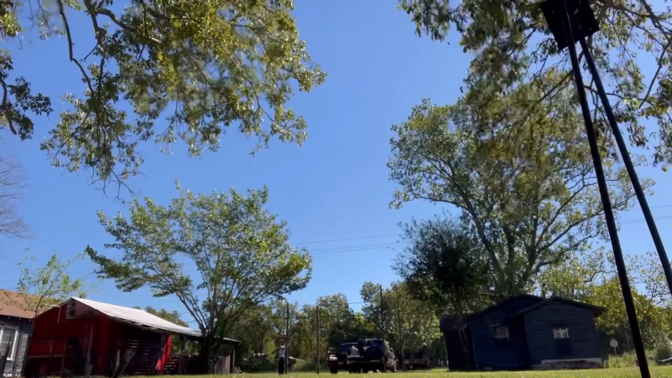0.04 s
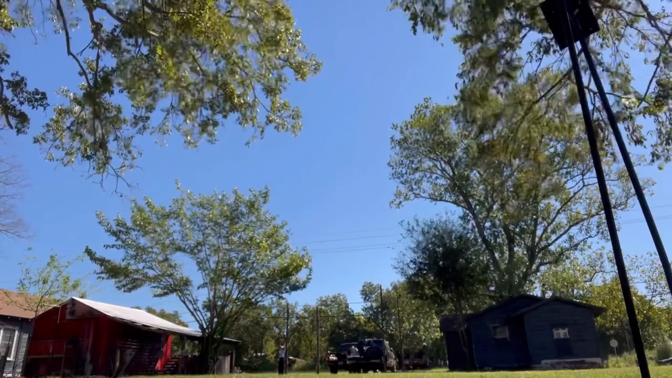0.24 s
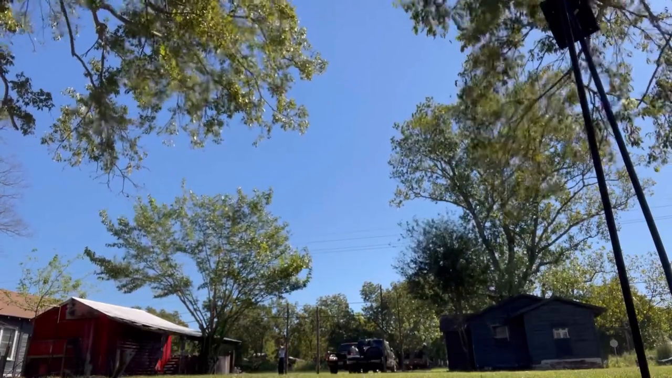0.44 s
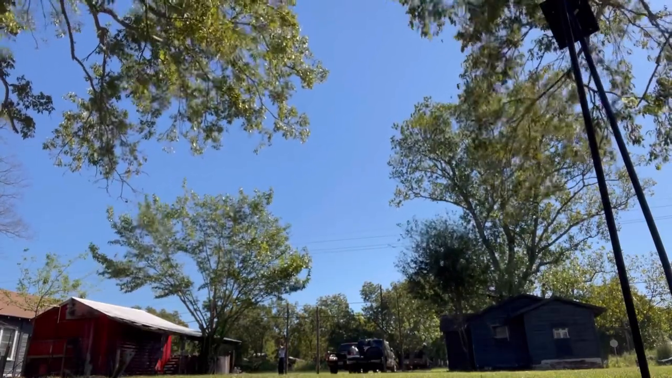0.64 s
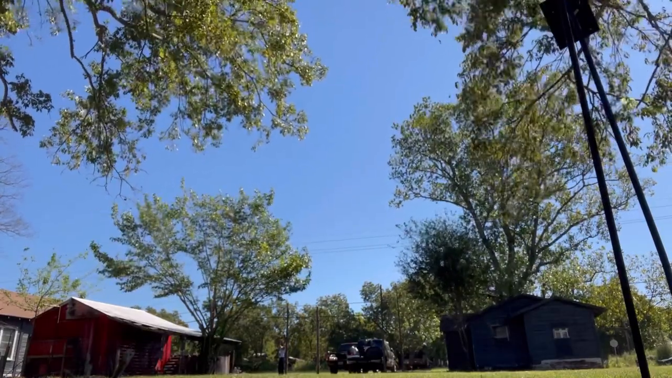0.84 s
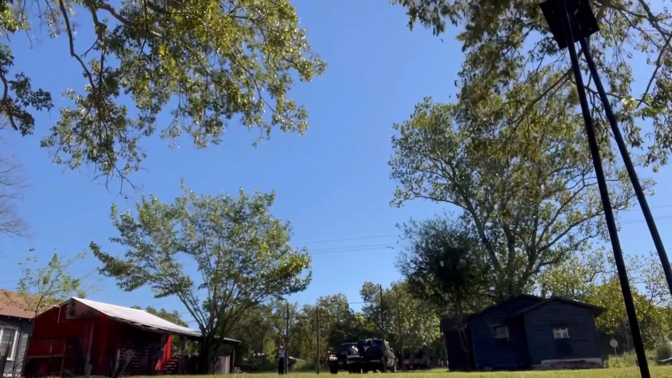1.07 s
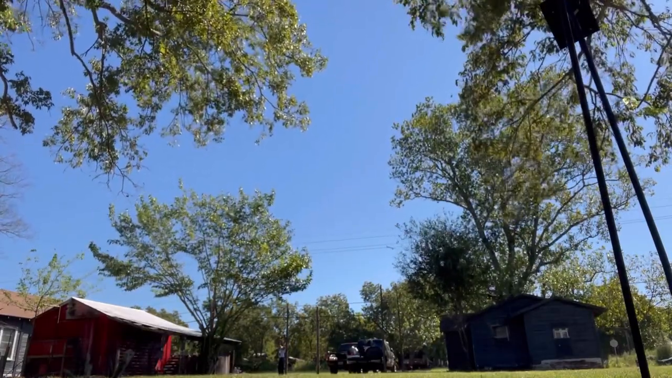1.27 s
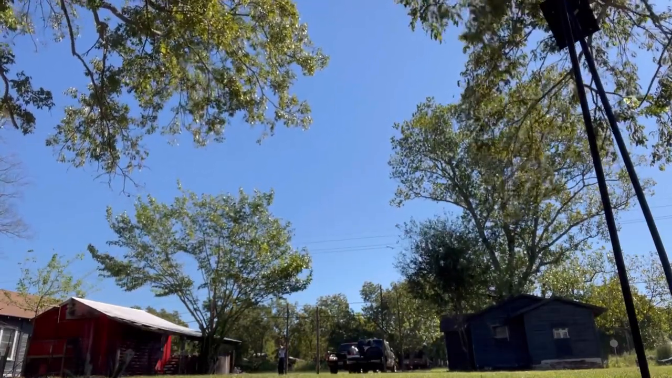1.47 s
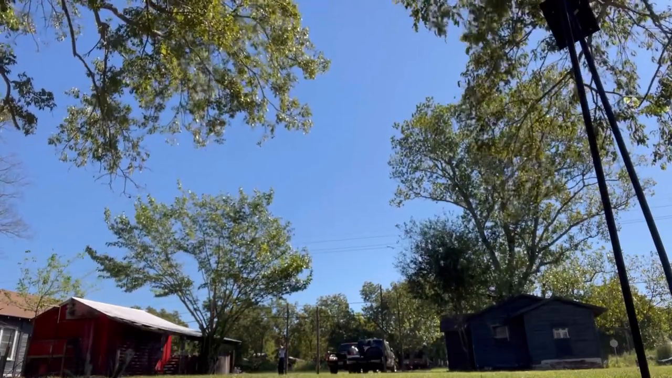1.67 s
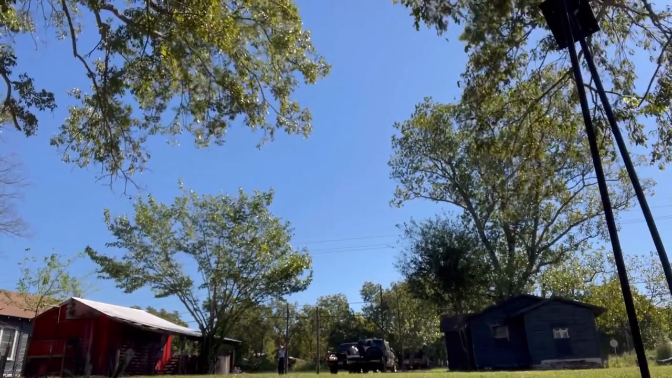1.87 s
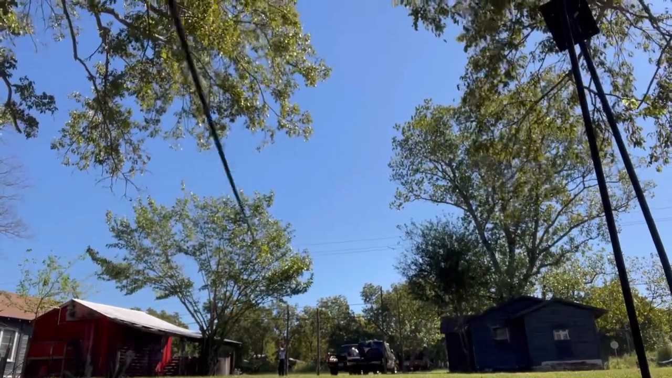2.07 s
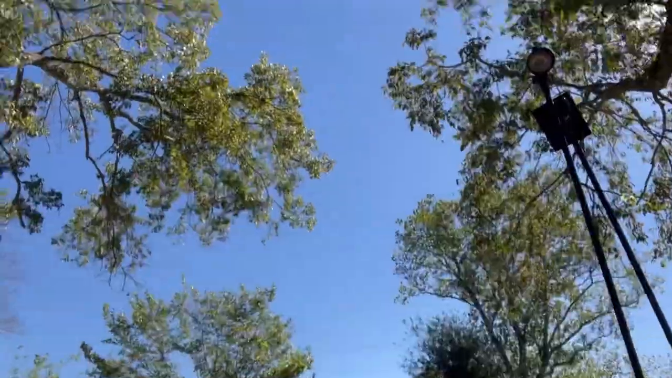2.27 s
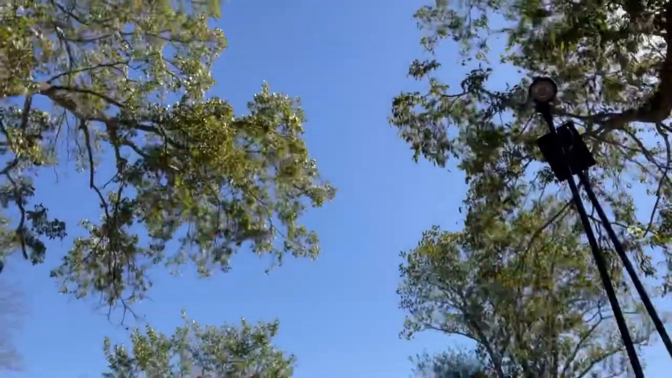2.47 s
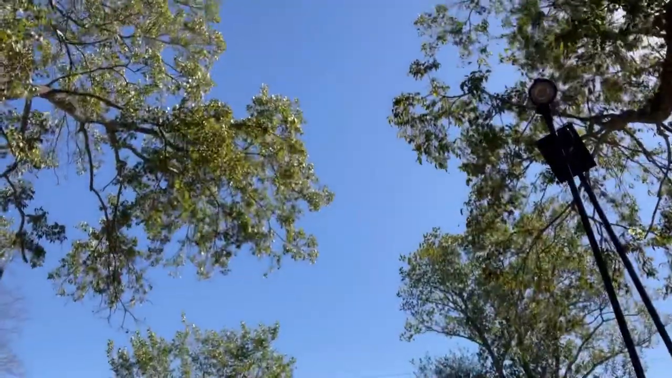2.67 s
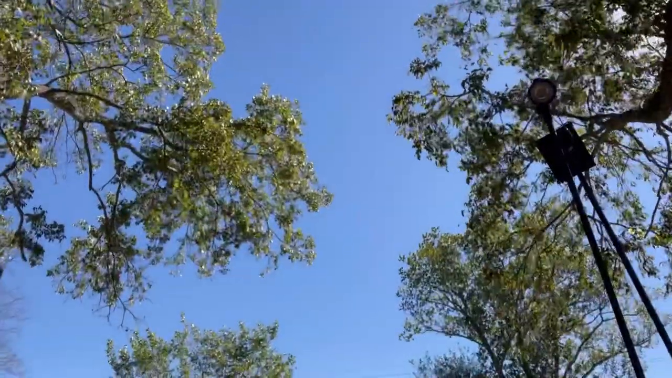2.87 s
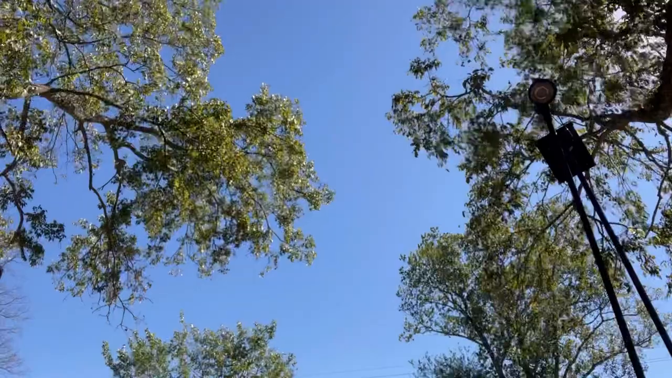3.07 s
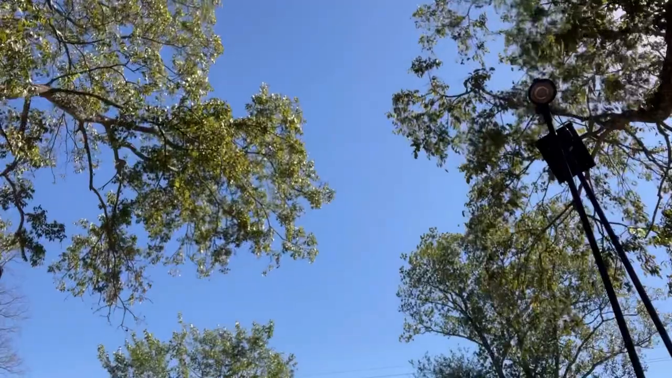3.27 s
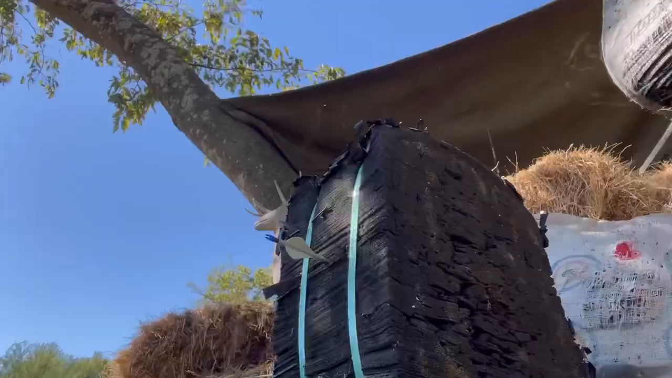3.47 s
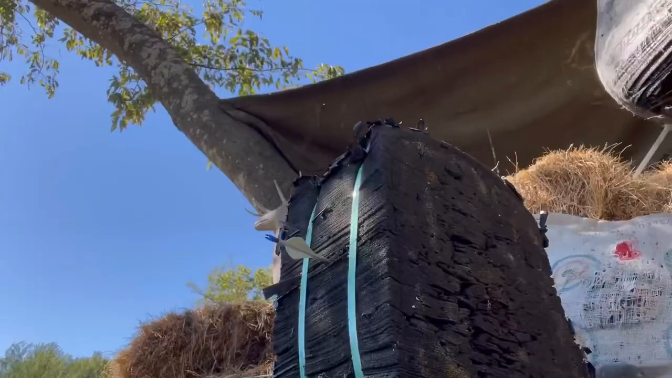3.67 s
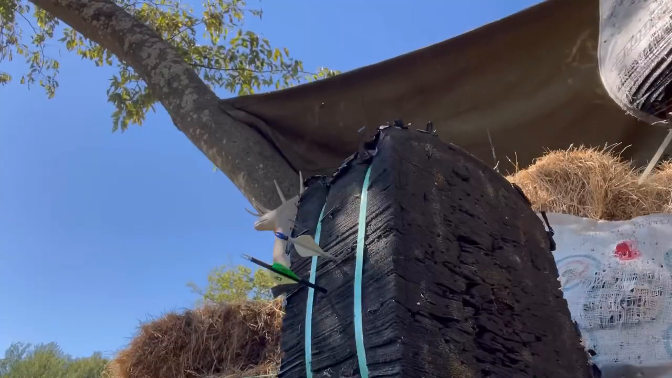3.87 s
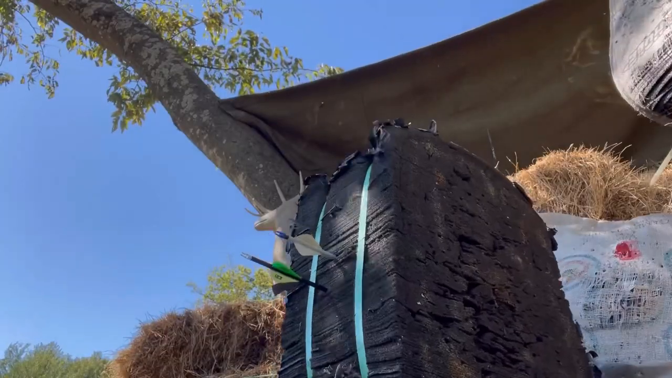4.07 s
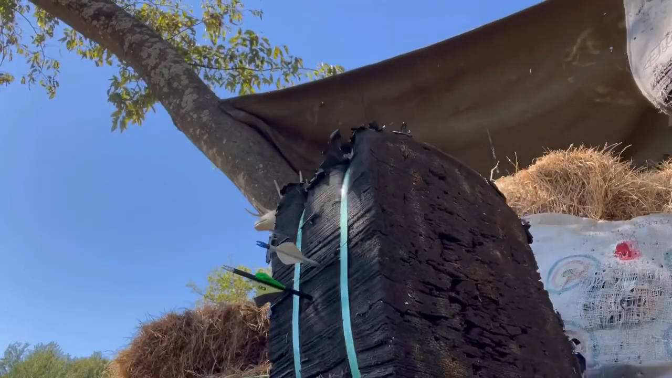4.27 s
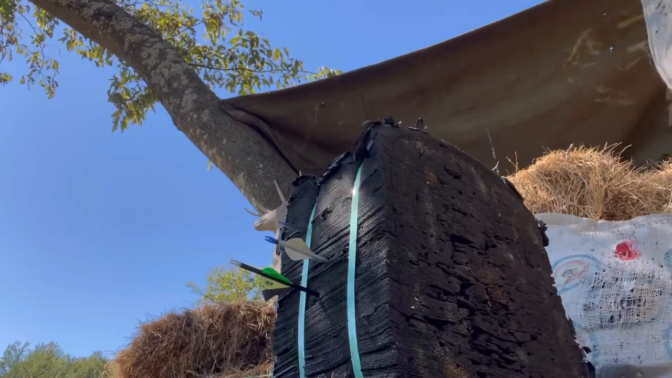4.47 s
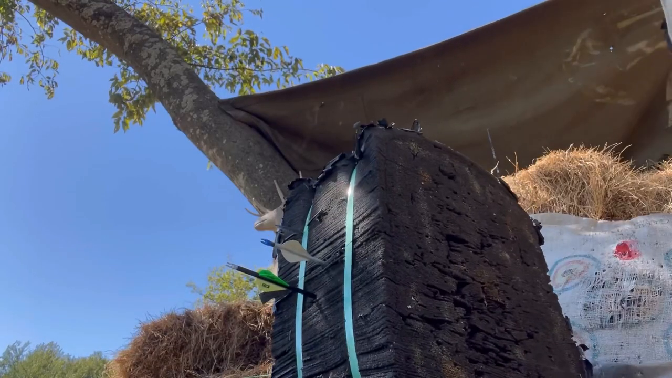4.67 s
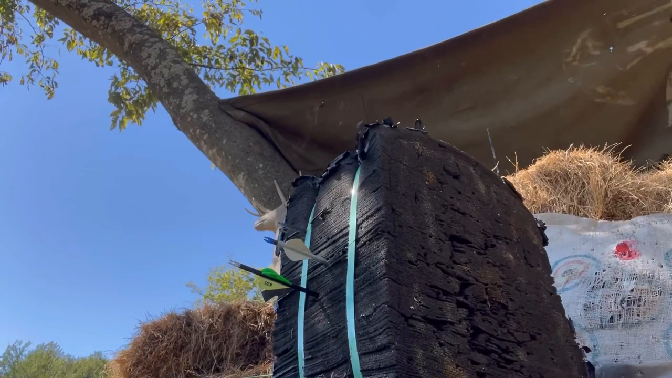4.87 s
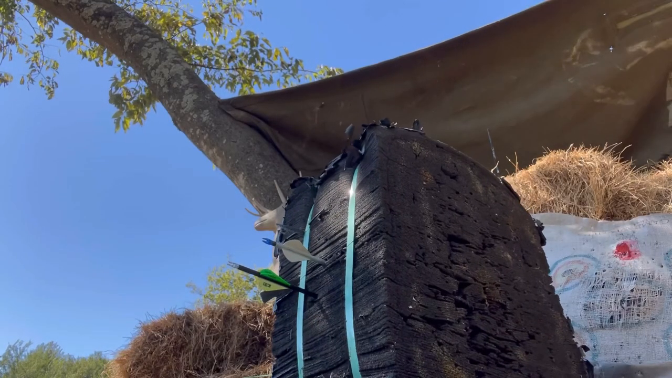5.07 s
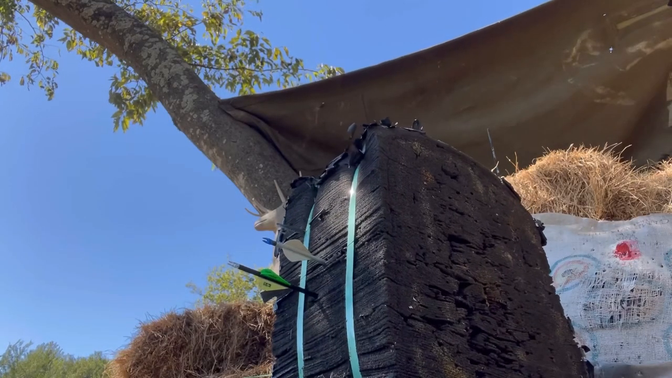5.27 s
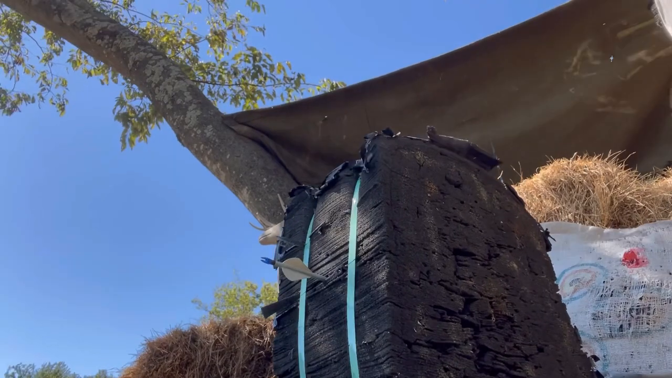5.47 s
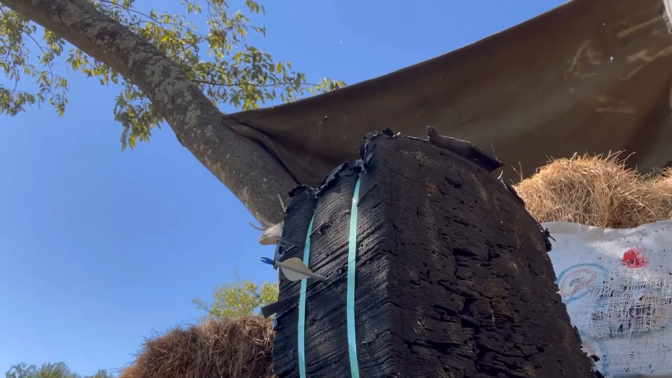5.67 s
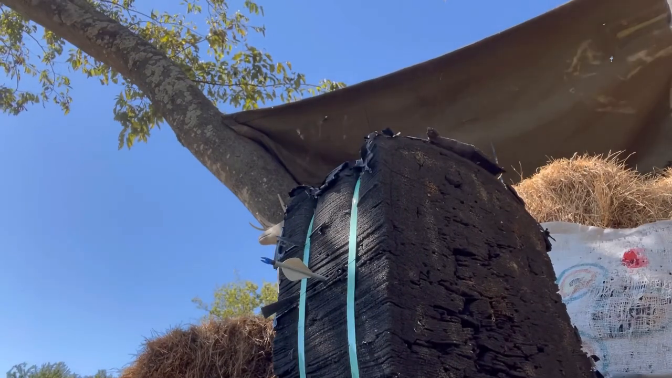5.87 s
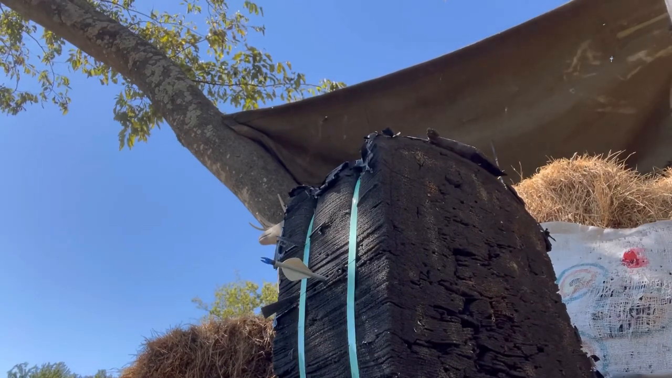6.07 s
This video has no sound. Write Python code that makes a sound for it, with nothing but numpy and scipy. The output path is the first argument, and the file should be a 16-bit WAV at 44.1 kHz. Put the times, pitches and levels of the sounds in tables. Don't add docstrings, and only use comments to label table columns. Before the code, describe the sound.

A faint distant bow twang, then an arrow thwacks hard into foam, jolting the microphone into crunching dry grass; a second brighter thwack follows with creaks.

```python
import sys
import numpy as np
from scipy import signal
from scipy.io import wavfile
from scipy.ndimage import uniform_filter1d, minimum_filter1d

SR = 44100
rng = np.random.default_rng(int(sys.argv[2]) if len(sys.argv) > 2 else 0)


def magnitude_from_level(level_db):
    exponent = np.asarray(level_db, float) / 20
    return 10 ** exponent


def generate_wav(sig):
    pcm = np.round(np.clip(np.atleast_2d(sig).T, -1, 1) * 32767).astype(np.int16)
    wavfile.write(sys.argv[1], SR, pcm)


N = 269803
T = np.arange(N) / SR
SIDES = np.array([[1.], [-1.]])


def at_hz(points, hz):
    points = np.array(points)
    return np.interp(np.log(hz), np.log(points[:, 0]), points[:, 1])


def pan(db):
    return magnitude_from_level(SIDES * np.asarray(db) / 2)


def drift(rate, size):
    knots = rng.standard_normal(int(size / SR * 60) + 3)
    step = np.clip(rate / 30, .01, 1)
    slow = signal.lfilter([step], [1, step - 1], knots)
    return np.interp(np.arange(size) * 60 / SR, np.arange(len(slow)), slow / slow.std())


def resonate(x, hz, width_hz):
    r = np.exp(-np.pi * min(width_hz, 9000) / SR)
    feedback = [1, -2 * r * np.cos(2 * np.pi * hz / SR), r * r]
    return signal.lfilter([1, 0, -1], feedback, x) * np.sqrt((1 - r * r) / 2)


def ring(hz, t60, bend=1, size=3000):
    t = T[:size]
    return np.sin(2 * np.pi * hz * t) * magnitude_from_level(-60 * (t / t60) ** bend)


def add(out, s, sound):
    i = int(round(s * SR))
    out[:, i:i + sound.shape[-1]] += sound[..., :N - i]


def coloured(white, spectrum, alike, patchy_db, split_hz=1500):
    size, halves = white.shape[-1], [0, 0]
    edges = 20 * 2 ** np.arange(0, 9.8, 1 / 3)
    shared = drift(0.85, size)
    for k, (low, high) in enumerate(zip(edges, edges[1:])):
        band = signal.butter(2, [low, high], "band", fs=SR, output="sos")
        mid, side = signal.sosfilt(band, white[k % 2])
        hz = np.sqrt(low * high)
        c = np.clip(at_hz(alike, hz), -.95, .95)
        gain = magnitude_from_level(at_hz(spectrum, hz) + patchy_db * (.5 * shared + drift(17.4, size)))
        halves[int(hz > split_hz)] += gain * (np.sqrt(1 + c) * mid + np.sqrt(1 - c) * side * SIDES)
    return [h / np.sqrt(np.mean(h.mean(0) ** 2)) for h in halves]


PLACE_STARTS = [0, .712, 3.505, 5.405, 6.2]
# f/Hz, level/dB [dB per Hz]
TOP = [(9000, -40), (10500, -30), (13000, -43.5), (16000, -45)]
TOP_B = [(9000, -56), (10800, -35), (13000, -56.5), (14500, -57), (16000, -57)]
# f/Hz, level/dB [dB per Hz]
AIR = [
    [(35, -102), (60, -64), (124, -13), (180, -2.5), (274, -4.5), (323, -15), (371, 1.5), (458, -8),
     (882, -10), (3670, -23), (6580, -36.5), (13900, -34), (16000, -36)],
    [(13, -43), (22, -32), (43, -3.5), (113, -0.5), (141, -8.0), (297, -11.5), (441, -15.5), (511, -12.5),
     (1130, -23.0), (1770, -29.5), (6090, -29.0), (8200, -34.0), (10700, -62), (18000, -120)][:-1] + TOP,
    [(13, -32), (22, -8.0), (107, -3.0), (125, -11.0), (148, -17.0), (205, -14), (249, -17.5), (297, -15.0),
     (579, -19.0), (950, -22.5), (2150, -42.5), (8200, -38.5), (10700, -84), (18000, -120)][:-1] + TOP_B,
    [(13, -46), (22, -27), (70, 2.5), (125, -1.0), (282, -16.5), (452, -16.0), (706, -19.5), (904, -27),
     (974, -23.5), (2260, -46.5), (2690, -45.0), (8200, -39.0), (10700, -82.0), (18000, -120)][:-1] + TOP_B,
]
# f/Hz, likeness [-1..1]
ALIKE = [
    [(60, 0.96), (240, 0.57), (950, 0.69), (3770, -0.16), (15000, -0.15)],
    [(60, 0.17), (180, 0.67), (550, 0.26), (1650, -0.24), (4970, -0.067), (15000, 0.41)],
    [(60, 0.78), (150, 0.59), (380, -0.059), (950, -0.6), (2380, 0.12), (5980, -0.31), (15000, -0.15)],
    [(60, 1), (180, 0.39), (550, -0.53), (1650, -0.38), (4970, -0.28), (15000, 0.044)],
]
# f/Hz, width/Hz, level/dB
DRONE = [
    [(193.5, 3.9, -54), (277.7, 4.8, -54), (365.4, 2.7, -52), (390, 6.4, -80), (423, 5.5, -51),
     (546, 11, -56.5), (873, 7.4, -60)],
    [(55, 9.5, -55), (82, 6.1, -65), (117.8, 9.1, -50), (3850, 920, -65)],
    [(49.7, 3.9, -49), (81.7, 1.3, -49), (116.2, 3, -47.5)],
    [(84.9, 10.3, -58.5), (120, 7, -50), (145, 7.4, -63)],
]
# rumble level/dB, leaf hiss level/dB, rumble swell [dB per s]
PLACE_LEVELS = [
    (-43, -51, -0.2),
    (-43.5, -60, 1.5),
    (-40.5, -68.5, -1.06),
    (-40, -71.5, 1),
]
# t/s, depth level/dB, recovery/s
DUCKS = [
    (2.25, -8, 0.019),
    (3.876, -5.5, 0.083),
]


def background():
    fade_s, lean_db, run_in = .024, -1.5, 6000
    tipped_s, tipping_s, sink_db_per_s = 2.37, 0.26, -1.25
    tipped_rumble_db, tipped_hiss_db = -5.5, -3
    out = np.zeros((2, N))
    places = zip(PLACE_STARTS, PLACE_STARTS[1:], AIR, ALIKE, DRONE, PLACE_LEVELS)
    for start, end, air, alike, drone, (rumble_db, hiss_db, swell_db) in places:
        t = T[int(start * SR):int(end * SR)]
        white = rng.standard_normal((2, 2, len(t) + run_in))
        rumble, hiss = coloured(white, air, alike, patchy_db=1.0)
        mid, side = rng.standard_normal((2, len(t) + run_in))
        tipped = np.clip((t - tipped_s) / tipping_s, 0, 1) * (start < tipped_s < end)
        sink_db = sink_db_per_s * (t - tipped_s)
        duck_db = 0
        for s, db, recovery_s in DUCKS:
            duck_db = duck_db + db * np.exp(-np.abs(t - s) / np.where(t < s, .02, recovery_s))
        hum = 0
        for hz, width_hz, db in drone:
            rough = resonate(mid + min(hz / 3000, 1) * SIDES * side, hz, width_hz)[:, run_in:]
            steady = np.sin(2 * np.pi * (hz * t + rng.random())) * (width_hz < 20)
            hum = hum + magnitude_from_level(db) * (0.81 * rough + 1.1 * steady)
        low_db = duck_db + swell_db * (t - start) + tipped * (tipped_rumble_db + sink_db)
        high_db = hiss_db + duck_db + tipped * (tipped_hiss_db + sink_db)
        heard = magnitude_from_level(low_db) * (magnitude_from_level(rumble_db) * rumble[:, run_in:] + hum)
        heard = heard + magnitude_from_level(high_db) * hiss[:, run_in:]
        if start:
            heard = heard * np.clip((t - start) / fade_s, .2, 1)
        else:
            heard = signal.sosfilt(signal.butter(4, 90, "high", fs=SR, output="sos"), heard)
        to_edge_s = np.minimum(t - start + (start == 0), end - t)
        no_click = np.clip(to_edge_s / .004, 0, 1)
        add(out, t[0], heard * pan(lean_db) * no_click)
    return out


def puff(out, s, db, hz, width_hz, rise_s, t60):
    t = T[:16000] - .1
    noise = resonate(rng.standard_normal((2, 16000)), hz, width_hz)
    noise = resonate(noise, hz, 2 * width_hz)
    mid, side = noise / noise.std()
    shape = np.where(t < 0, np.exp(t / rise_s), magnitude_from_level(-60 * np.maximum(t, 0) / t60))
    add(out, s - .1, magnitude_from_level(db) * shape * (mid + .7 * side * SIDES))


# t/s, level/dB, f/Hz, width/Hz, t60/s
SIGHS = [
    (3.672, -61.5, 6800, 3000, 0.28),
    (3.932, -64.5, 11500, 3000, 0.31),
    (4.09, -56, 1190, 820, 0.55),
    (4.09, -46, 300, 162, 0.22),
    (5.726, -67.5, 7150, 1195, 0.26),
    (6.112, -70, 3000, 5000, 0.11),
]


def sighs():
    out = np.zeros((2, N))
    for s, db, hz, width_hz, t60 in SIGHS:
        puff(out, s, db, hz, width_hz, 0.03 * t60, t60)
    return out


# t/s, level/dB, f/Hz, t60/s, left-right level/dB
SWAYS = [(2.106, -12, 147.4, 0.06, 3.5), (2.1207, -12.5, 63.4, 0.08, 6), (2.1885, -24, 100, 0.034, 4),
         (2.185, -22.5, 64, 0.1, 4), (2.374, -11, 214, 0.011, 6), (2.318, -28, 134, 0.051, 5),
         (2.15, -32.5, 160, .07, 3), (2.4740, -29, 73, 0.046, 0), (2.517, -32, 55, 0.1, 2),
         (4.9, -33, 116, 0.064, -2.5), (3.842, -11, 138, 0.037, 2), (3.8645, -19, 98, 0.028, 0.5),
         (4.6, -18, 51, 0.055, 2.5)]


def sways():
    out = np.zeros((2, N))
    for s, db, hz, t60, lr_db in SWAYS:
        onset = np.clip(T[:9000] * hz * 2, 0, 1)
        add(out, s, magnitude_from_level(db) * pan(lr_db) * ring(hz, t60, bend=1.84, size=9000) * onset)
    return out


def rustle(strokes, spectrum, per_s, split_hz, scrape, span, low_db, lr_db):
    t = T[int(span[0] * SR):int(span[1] * SR)]
    shape = (2, 2, len(t))
    clumps = magnitude_from_level(2.5 * drift(40.0, len(t)))
    sizes = magnitude_from_level(5.1 * np.minimum(rng.exponential(1, shape), 4))
    clicks = (rng.random(shape) < per_s * clumps / SR) * sizes
    clicks = clicks * rng.choice([-1, 1], shape) + 0.41 * rng.standard_normal(shape)
    alike = [(100, 0.209), (3000, 0.05)]
    low, high = coloured(clicks, scrape + list(spectrum), alike, 1.5, split_hz)
    level = 0
    for s, db, rise, hold, fall in strokes:
        away = np.maximum((s - t) / rise, (t - s - hold) / fall)
        level = level + magnitude_from_level(db - 30 * np.maximum(0, away))
    edge = np.clip(np.minimum(t - t[0], t[-1] - t) / 0.0074, 0, 1)
    out = np.zeros((2, N))
    add(out, t[0], edge * level * pan(lr_db) * (high + magnitude_from_level(low_db) * low))
    return out


# full strength t/s, level/dB, 30 dB rise/s, hold/s, 30 dB fall/s
CREAK = [
    (4.1, -52.5, 0.11, 0.027, 0.007),
    (4.154, -58.5, 0.016, .004, 0.052),
    (4.2, -62, 0.046, 0.0024, 0.012),
]
# f/Hz, level/dB [dB per Hz]
CREAK_AIR = [(1470, -30), (2500, -40), (3010, -29), (3650, -38), (3880, -40), (6510, 2), (8790, -23),
             (10800, -8), (15800, -20)]


def target_creak():
    scrape = [(200, -27), (300, 5), (900, 0), (1500, -0.5)]
    return rustle(CREAK, CREAK_AIR[1:], 8000., 3000, scrape, (3.98, 4.22), low_db=7.5, lr_db=-1.0)


# full strength t/s, level/dB, 30 dB rise/s, hold/s, 30 dB fall/s
SLIDE = [
    (2.119, -46, .008, 0.078, 0.07),
    (2.2245, -41, 0.008, 0.003, .01),
]
# f/Hz, level/dB [dB per Hz]
SLIDE_AIR = [(710, -34), (1200, -6), (2620, -8), (7250, -6), (12500, -52), (14900, -61), (15500, -29)]


def microphone_slide():
    scrape = [(60, -24.5), (250, 7.0), (700, -1.5)]
    return rustle(SLIDE, SLIDE_AIR[1:], 4000., 1300, scrape, (2.108, 2.26), low_db=-0.5, lr_db=3.5)


# full strength t/s, level/dB, 30 dB rise/s, hold/s, 30 dB fall/s
LANDING = [
    (2.287, -46, 0.006, .015, 0.1),
    (2.318, -39.5, 0.064, 0.016, 0.032),
    (2.339, -29, 0.022, 0.045, 0.041),
]
SETTLING = [
    (2.463, -49, 0.058, 0.029, 0.05),
    (2.54, -55.5, 0.3, 0.02, 0.42),
]
# f/Hz, level/dB [dB per Hz]
GRASS_AIR = [(710, -25), (1200, -8.5), (2140, -1), (2680, -9), (3980, -1), (5200, -9.5), (7800, -5),
             (9200, -24), (13000, -20), (14500, -55)]
GRASS_LEAN_DB = 2.5


def grass_landing():
    crush = [(60, -7), (200, -0.5), (450, -1.5), (900, -6)]
    settle = [(60, -24), (250, 0.0), (700, 5.0)]
    out = rustle(LANDING, GRASS_AIR[1:], 3200., 1300, crush, (2.26, 2.44), -1.4, GRASS_LEAN_DB)
    return out + rustle(SETTLING, GRASS_AIR[1:], 900., 1300, settle, (2.41, 2.8), 4.5, GRASS_LEAN_DB)


def tick(out, s, db, hz, knock_db, lr_db):
    t60, width_hz, lag_ms = .007, 1.1 * hz, .06
    bright, dull = rng.standard_normal((2, 800)) * magnitude_from_level(-60 * T[:800] / t60)
    bright = resonate(resonate(bright, hz, width_hz), hz, 2 * width_hz)
    bright = signal.lfilter(*signal.butter(2, 1.5 * hz, fs=SR), bright)
    dull = resonate(dull, 1169, 1398)
    sound = magnitude_from_level(db) * (bright / np.abs(bright).max() + magnitude_from_level(knock_db) * dull / np.abs(dull).max())
    add(out[:1], s + lag_ms / 1000, pan(lr_db)[0] * sound)
    add(out[1:], s, pan(lr_db)[1] * sound)


# t/s, peak level/dB, f/Hz, knock level/dB relative
SNAPS = [(2.2828, -37, 2900, -10), (2.2866, -30, 7500, -8), (2.2935, -40, 7500, -11),
         (2.3190, -23, 3900, -7), (2.3237, -35, 3340, -17), (2.3268, -33, 3600, -11),
         (2.3364, -26, 4200, -11), (2.3427, -20.5, 2080, -5), (2.3461, -31, 4000, -12.5),
         (2.3582, -24, 4000, -8), (2.3615, -20, 7000, -20), (2.3671, -15, 3800, -14),
         (2.3839, -23.5, 2500, 3.5), (2.3985, -38, 3700, -11)]
SCUFFS = [(2.1448, -35, 5030, 0), (2.1480, -40, 7140, 9), (2.1712, -32, 3660, -17), (2.1947, -41, 4250, -6),
          (2.225, -42, 8060, -8), (2.2330, -31, 6960, 1), (2.2340, -32, 3220, 5), (2.2745, -40, 4220, -12),
          (2.4447, -35, 4790, -6), (2.463, -28.5, 6000, 0.5), (2.475, -46, 2500, 12),
          (2.4890, -44, 3500, -6), (2.503, -37, 3000, -7), (2.5097, -44, 7780, -6), (2.52, -34, 6000, -6),
          (2.569, -41, 4000, 1), (2.5928, -45, 2100, -10), (2.6190, -48, 2200, -4), (2.631, -48, 2200, -10),
          (2.6440, -52, 4000, 1), (2.674, -34, 6560, -11), (2.8, -46, 8300, -2), (2.8237, -41.5, 6090, -6)]


def snaps_and_scuffs():
    out = np.zeros((2, N))
    for row in SNAPS:
        tick(out, *row, GRASS_LEAN_DB)
    for row in SCUFFS:
        tick(out, *row, 11.5)
    return out


# t/s, peak level/dB, f/Hz
FOAM_TICKS = [
    (1.875, -34.5, 3670),
    (3.6795, -37, 3500),
    (3.6800, -36, 10500),
    (4.1247, -32, 11000),
    (4.1424, -36, 11800),
    (4.153, -36, 7600),
    (4.2014, -55, 3710),
    (4.3246, -44, 12000),
    (5.0395, -41, 8500),
]


def foam_ticks():
    out = np.zeros((2, N))
    for row in FOAM_TICKS:
        tick(out, *row, knock_db=-23, lr_db=-4.5)
    return out


# t/s, limb level/dB, string level/dB, fizz level/dB, ring/s
LOOSED = [
    (1.875, -45.5, -46, -52, 0.18),
    (3.671, -47, -54.5, -61.5, 0.39),
]
# f/Hz, width/Hz, share of ring time
TWANG = [
    (880, 780, 0.58),
    (3730, 990, 0.76),
    (10450, 1400, 1.3),
]


def bow_twang():
    out = np.zeros((2, N))
    for s, *levels, ring_s in LOOSED:
        for db, (hz, width_hz, share) in zip(levels, TWANG):
            puff(out, s, db, hz, width_hz, .002, share * ring_s)
    return out


# t/s, level/dB, f/Hz, width/Hz, rise/s
WHISTLES = [
    (2.084, -50.5, 6360, 318, 0.039),
    (3.826, -64, 6360, 1500, .09),
]
# t/s, shaft hiss level/dB, hiss f/Hz, torn foam level/dB, tear f/Hz
ARRIVES = [
    (2.1014, -37.5, 2900, -26, 673),
    (3.84, -33, 5130, -18, 720),
]


def flight_and_tear():
    out = np.zeros((2, N))
    for row in WHISTLES:
        puff(out, *row, t60=.056)
    for s, hiss_db, hiss_hz, tear_db, tear_hz in ARRIVES:
        puff(out, s - 0.0018, hiss_db, hiss_hz, 0.76 * hiss_hz, rise_s=0.0053, t60=0.091)
        puff(out, s, tear_db, tear_hz, 500, rise_s=0.0043, t60=0.056)
    return out


def strike(out, s, modes, gains, lag_ms, lr_db):
    chance = magnitude_from_level(1.5 * rng.standard_normal((2, len(modes))))
    for ear, late_s in enumerate((lag_ms / 1000, 0)):
        sound = 0
        for gain, (hz, db, *decay) in zip(gains * chance[ear], modes):
            sound = sound + gain * magnitude_from_level(db) * ring(hz, *decay)
        add(out[ear:ear + 1], s + late_s, pan(lr_db)[ear] * sound)


# t/s, thud level/dB, thud f/Hz, crack level/dB, left-right level/dB
FIRST_JOLTS = [(2.1022, -6.5, 1700, -8, -1), (2.1040, -3.5, 390.4, -26, -0.5), (2.1071, -7, 190, -28, -8),
               (2.1082, -6, 170, -22, 6.5), (2.1084, -5, 1116, -18.5, -3),
               (2.1090, -13.5, 1500, -21.5, 0.5), (2.1097, -1, 640, -16.5, 11),
               (2.1112, -1.5, 300, -41.5, 7.5), (2.1144, -7, 327, -55, 5.5), (2.1176, -19, 400, -54, -0.5)]
SECOND_JOLTS = [(3.8386, -30, 1400, -12, -2), (3.8391, 2, 935, -7.5, -3), (3.8405, -7, 310, -15, 2),
                (3.8443, -8, 260, -12, -3), (3.8462, -12, 1200, -18, -4), (3.8477, -5, 380, -20, -1.5),
                (3.8497, -6.5, 302, -29, 4.5), (3.8527, -9, 744, -40, 5), (3.8540, -16.5, 900, -34, -4),
                (3.8553, -13, 690, -44, -2), (3.8576, -3, 180, -45, -0.5)]
# f/Hz, level/dB
FIRST_MODES = [(150, -6), (280, -3), (370, -1), (565, -0.5), (760, 4), (1100, -7.5), (1500, -15.5),
               (1900, -17)]
SECOND_MODES = [(145, -10), (220, -3), (290, -2.5), (400, 4.5), (560, -7), (740, 6.5), (1050, 3),
                (1300, -20), (1620, 5.5)]
# f/Hz, level/dB, t60/s
TIPS = [
    [(1760, 2, .004), (2200, 6.5, .004), (2900, 12, 0.005), (3600, 14.5, 0.0055), (4500, 3, .003),
     (5210, -1, .003), (5950, -2, 0.0062), (8000, -15, .003), (11500, -6, .003)],
    [(2830, -40, 0.0032), (4180, -11, 0.0044), (5260, -0.5, 0.0049), (6320, -1, 0.0033), (7900, -3, 0.0061),
     (11000, 3, 0.0074), (13160, -5, .004)],
]
TIP_LAGS = [
    .29,
    0.027,
]


def arrow(jolts, modes, tip, soft_hz, tip_lag_ms):
    thud, crack = np.zeros((2, 2, N))
    damped = [(hz, db, 4.6 / hz + .006) for hz, db in modes]
    mode_hz = np.array(modes)[:, 0]
    swing = (-1.) ** np.arange(1, len(modes) + 1)
    for s, thud_db, pitch_hz, crack_db, lr_db in jolts:
        lag_ms = .23 + .02 * lr_db
        near_db = -6.0 * np.abs(np.log2(mode_hz / pitch_hz))
        strike(thud, s, damped, swing * magnitude_from_level(thud_db + near_db - 10), lag_ms, lr_db)
        own = [(pitch_hz, 0, min(4.2 / pitch_hz, .0095), 2)]
        strike(thud, s, own, magnitude_from_level([thud_db]), lag_ms, lr_db)
        strike(crack, s, tip, magnitude_from_level(crack_db - 10.5), tip_lag_ms, lr_db)
    soft = signal.butter(3, [38, soft_hz], "band", fs=SR, output="sos")
    return signal.sosfilt(soft, thud + 1e-18) + crack


def scene():
    loose = sighs() + sways() + target_creak() + microphone_slide() + grass_landing()
    loose = loose + snaps_and_scuffs() + foam_ticks()
    first = arrow(FIRST_JOLTS, FIRST_MODES, TIPS[0], soft_hz=2417, tip_lag_ms=TIP_LAGS[0])
    second = arrow(SECOND_JOLTS, SECOND_MODES, TIPS[1], soft_hz=1840, tip_lag_ms=TIP_LAGS[1])
    return background() + loose + bow_twang() + flight_and_tear() + first + second


def limiter(x, top=.95, hold_s=.002):
    width = int(hold_s * SR)
    gain = np.minimum(1, top / (np.abs(x).max(0) + 1e-9))
    return x * uniform_filter1d(minimum_filter1d(gain, 2 * width + 1), width)


def top_cut(x):
    return signal.sosfilt(signal.butter(12, 16780, fs=SR, output="sos"), x)


def record(dry):
    mix = limiter(dry)
    return top_cut(mix)


dry = scene()
out = record(dry)
generate_wav(out)
```